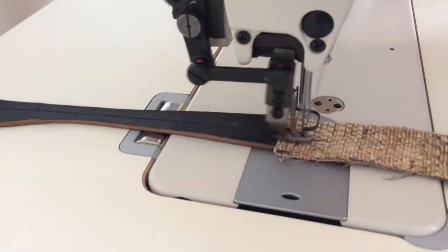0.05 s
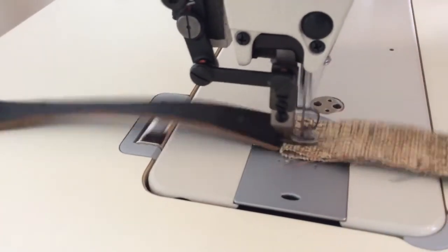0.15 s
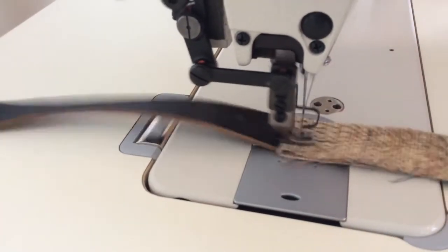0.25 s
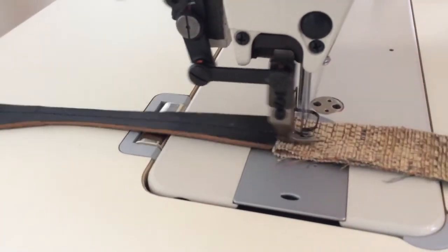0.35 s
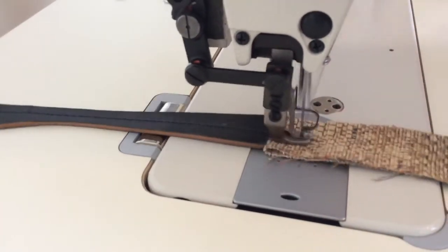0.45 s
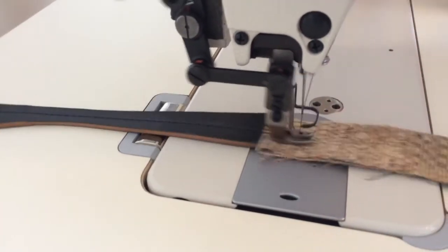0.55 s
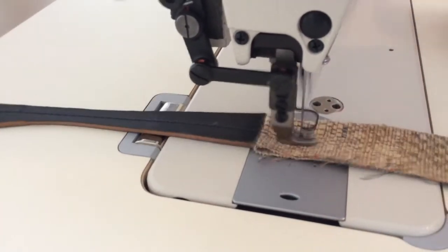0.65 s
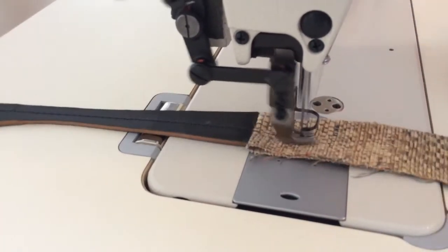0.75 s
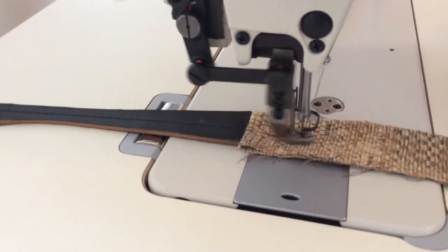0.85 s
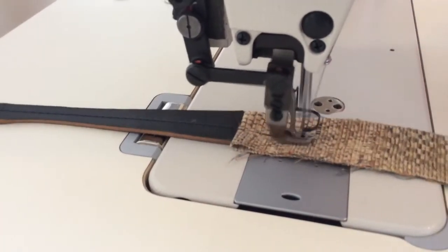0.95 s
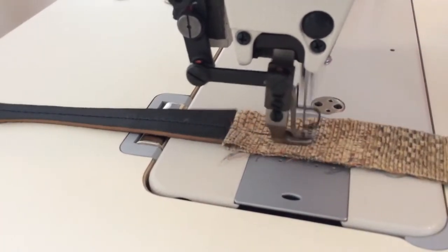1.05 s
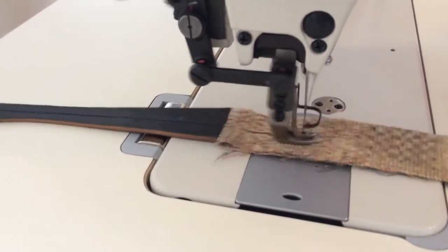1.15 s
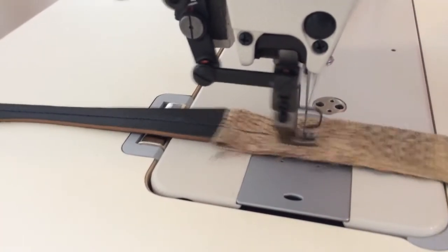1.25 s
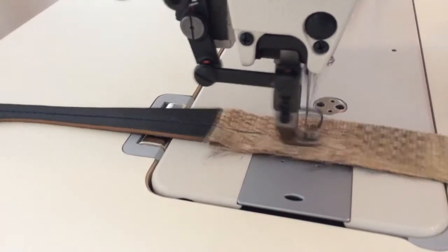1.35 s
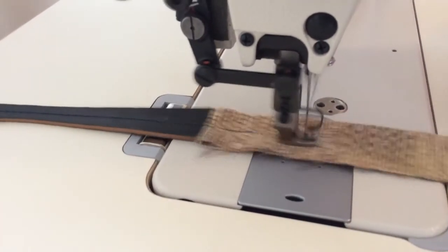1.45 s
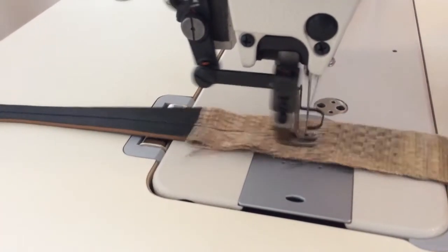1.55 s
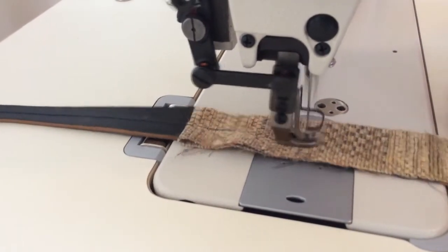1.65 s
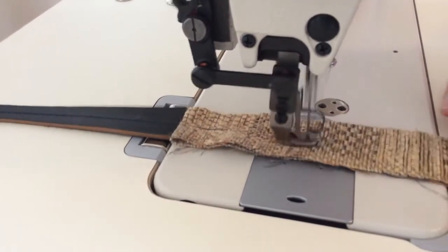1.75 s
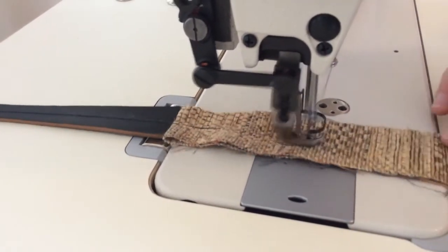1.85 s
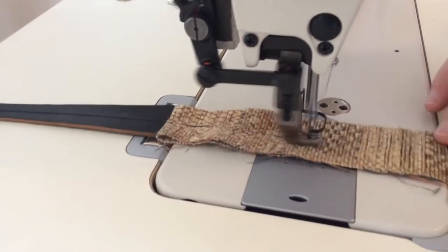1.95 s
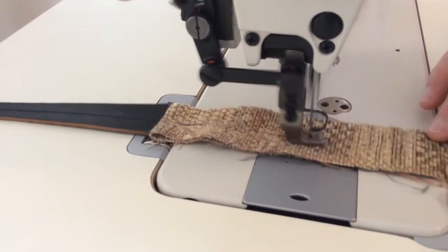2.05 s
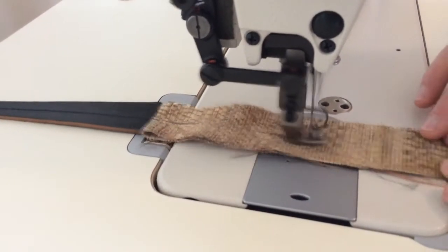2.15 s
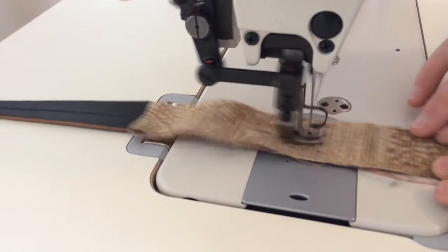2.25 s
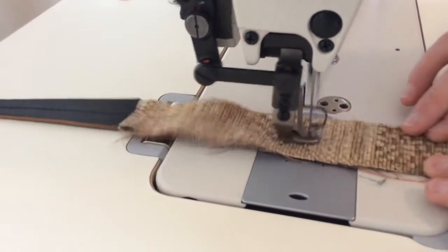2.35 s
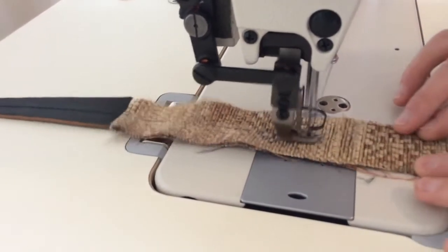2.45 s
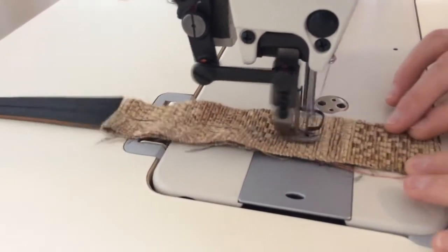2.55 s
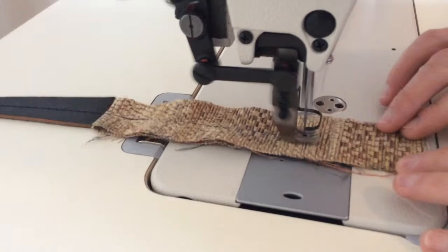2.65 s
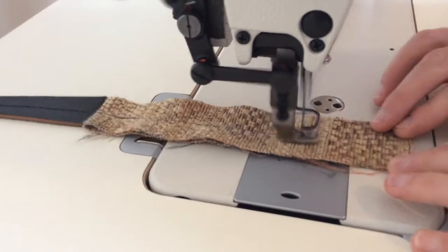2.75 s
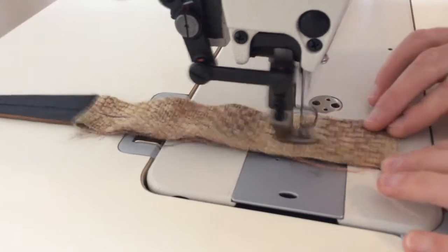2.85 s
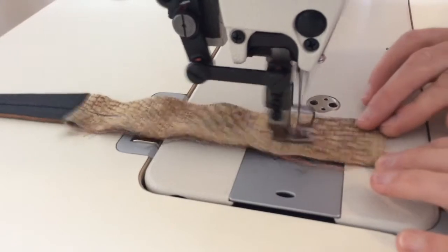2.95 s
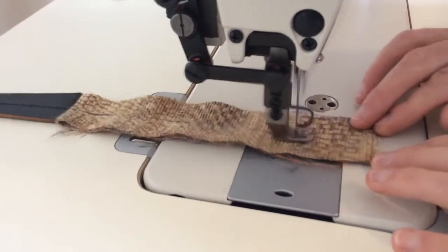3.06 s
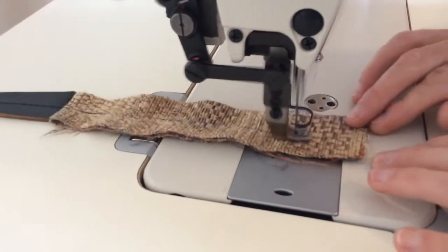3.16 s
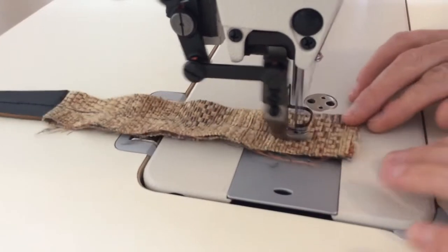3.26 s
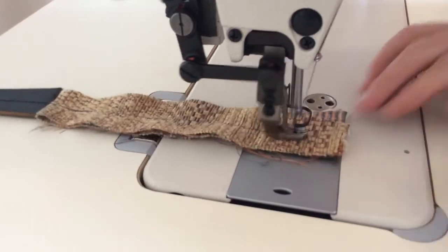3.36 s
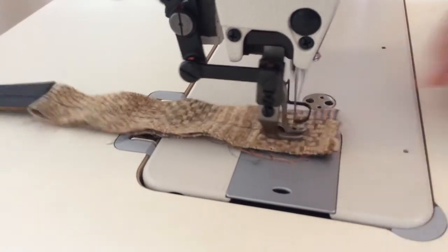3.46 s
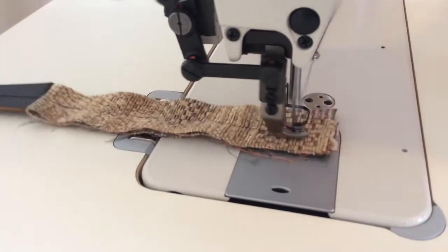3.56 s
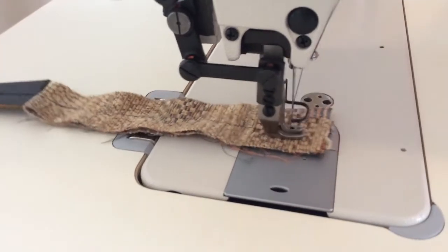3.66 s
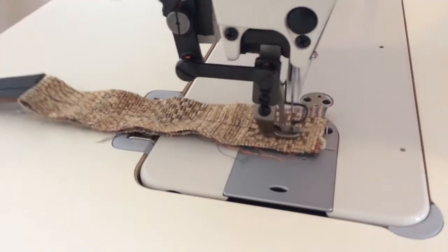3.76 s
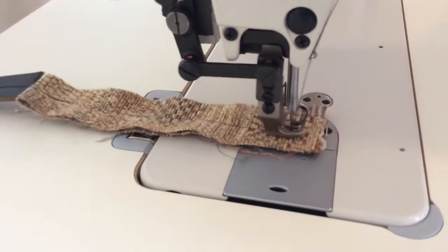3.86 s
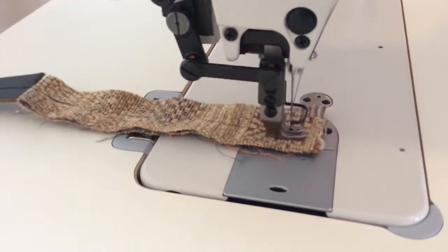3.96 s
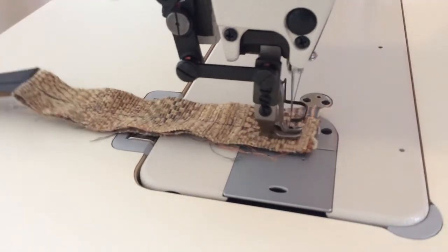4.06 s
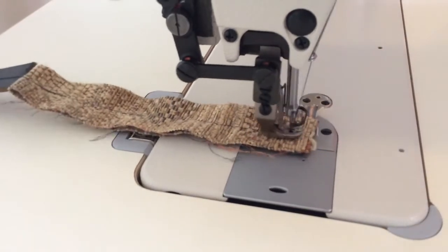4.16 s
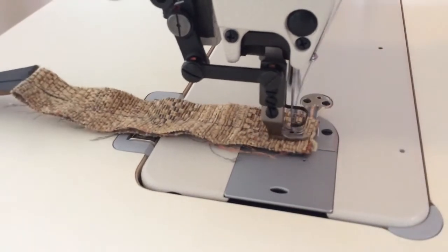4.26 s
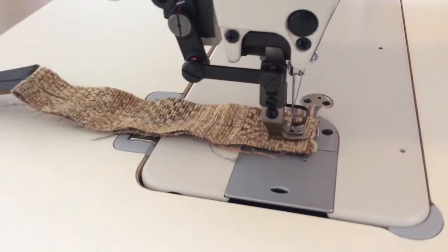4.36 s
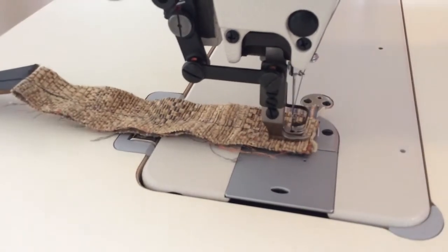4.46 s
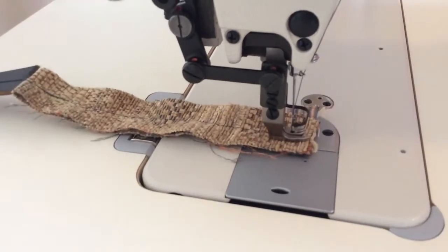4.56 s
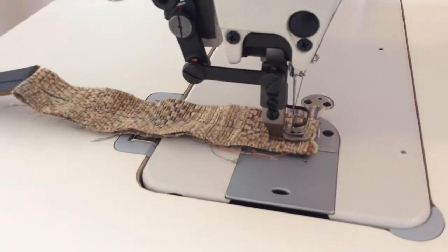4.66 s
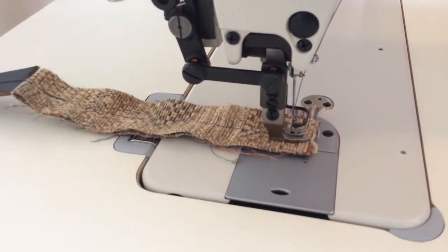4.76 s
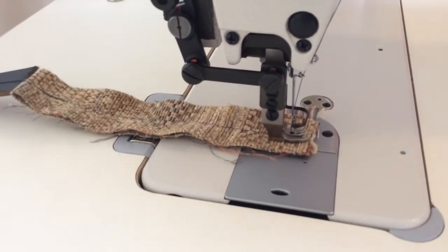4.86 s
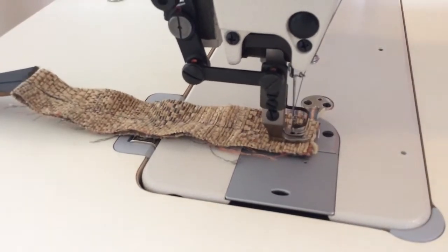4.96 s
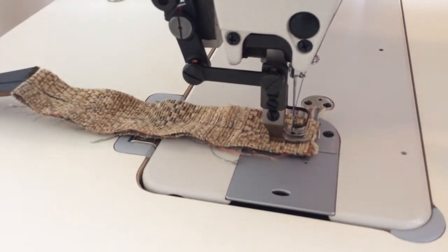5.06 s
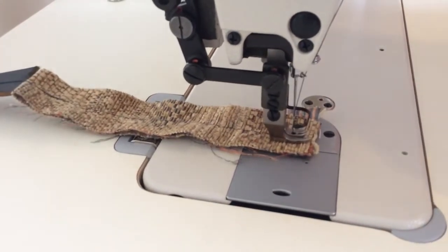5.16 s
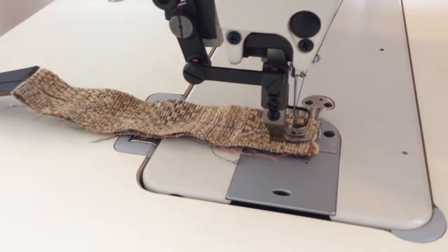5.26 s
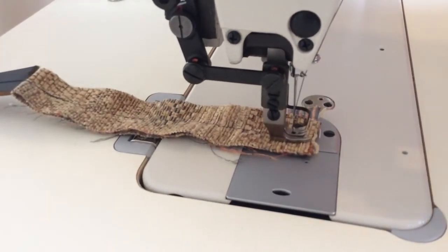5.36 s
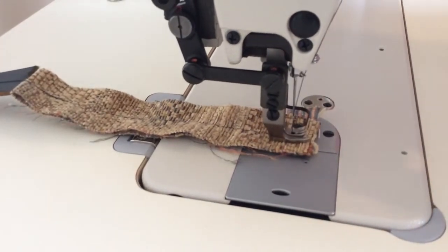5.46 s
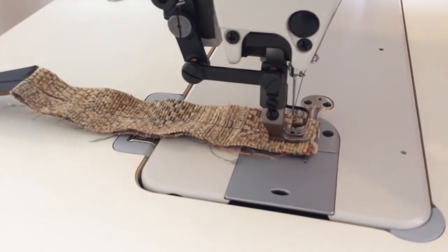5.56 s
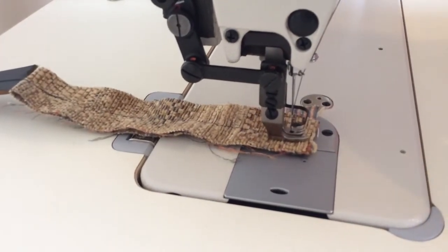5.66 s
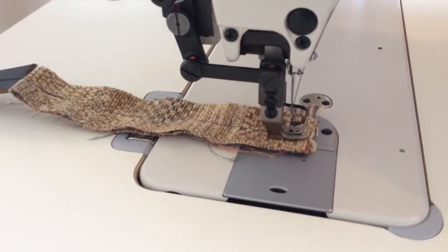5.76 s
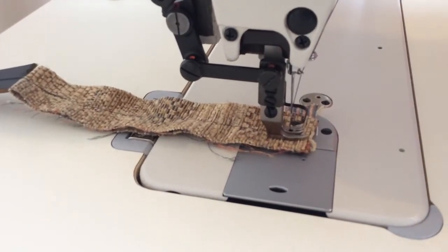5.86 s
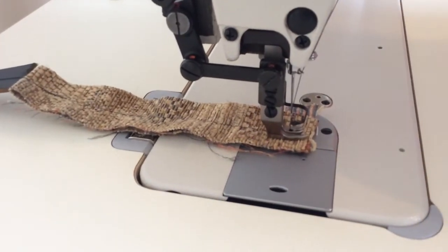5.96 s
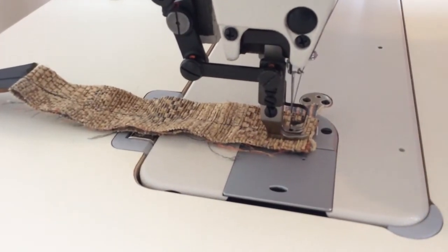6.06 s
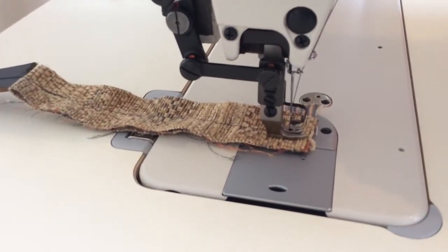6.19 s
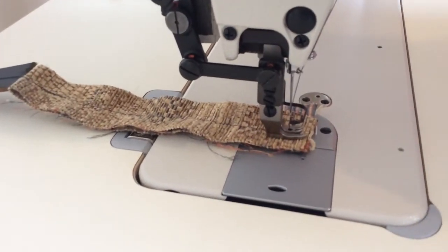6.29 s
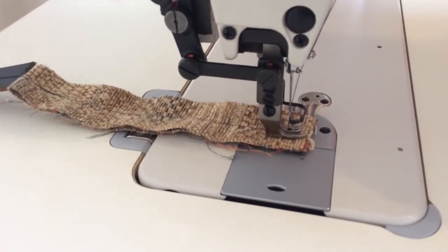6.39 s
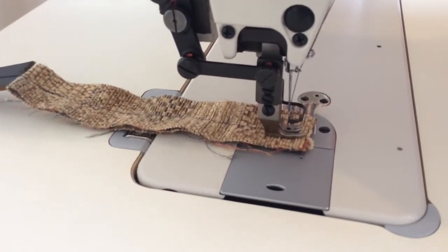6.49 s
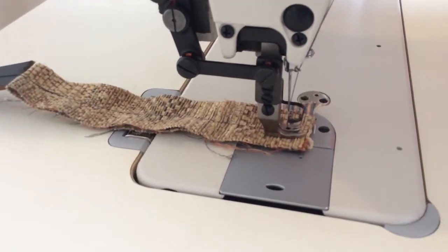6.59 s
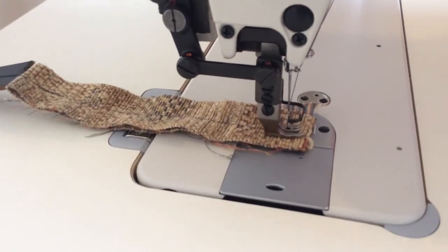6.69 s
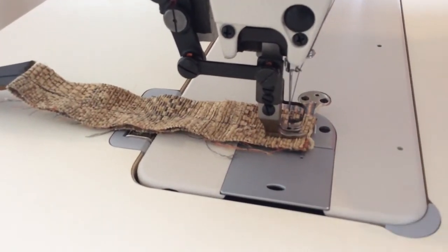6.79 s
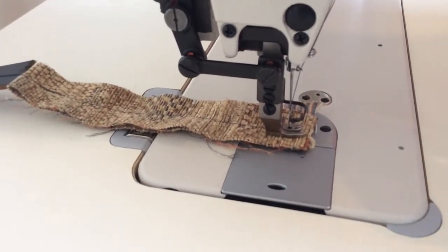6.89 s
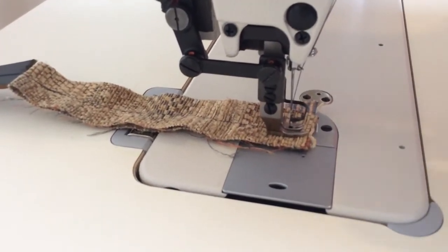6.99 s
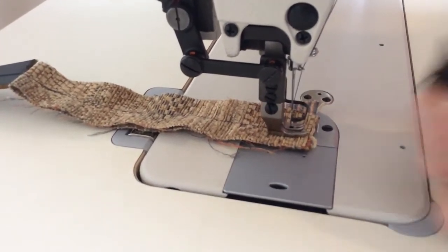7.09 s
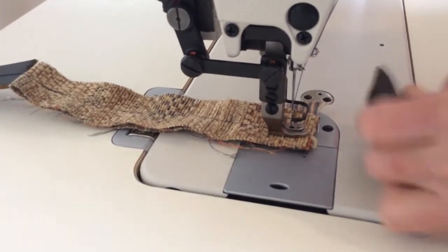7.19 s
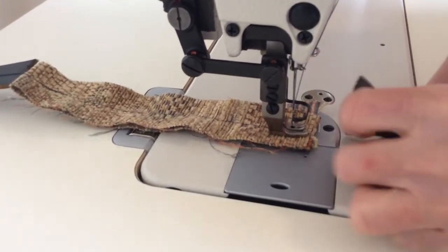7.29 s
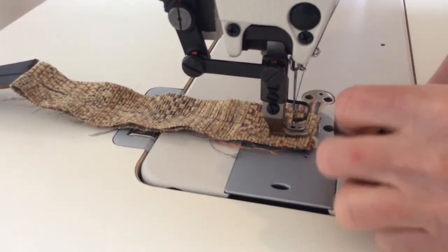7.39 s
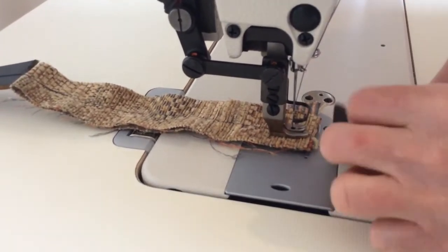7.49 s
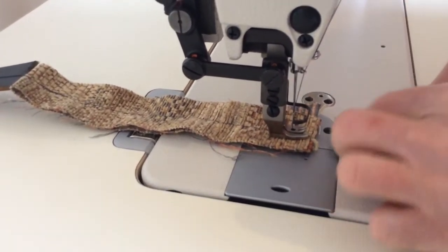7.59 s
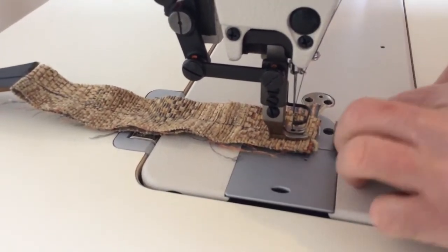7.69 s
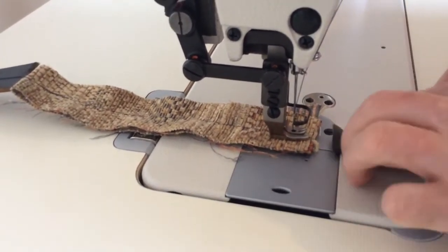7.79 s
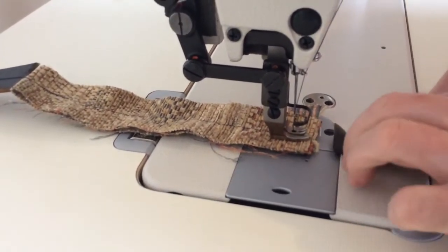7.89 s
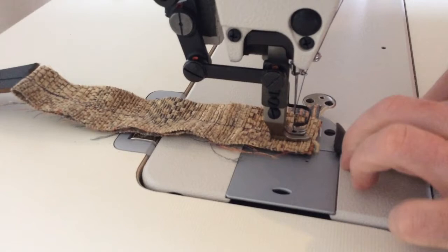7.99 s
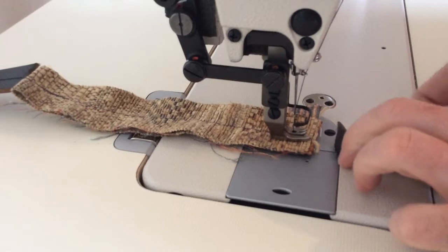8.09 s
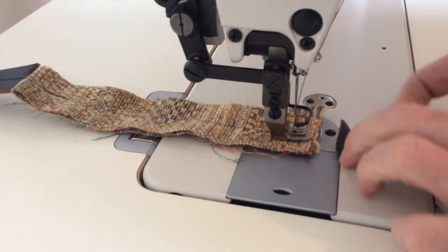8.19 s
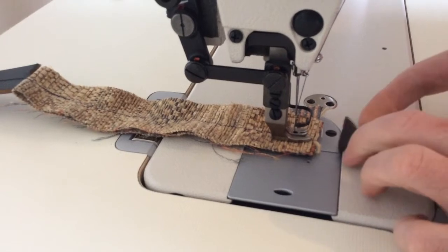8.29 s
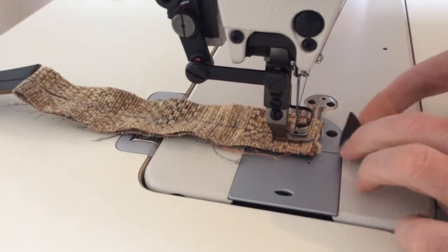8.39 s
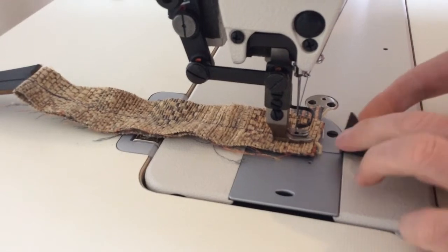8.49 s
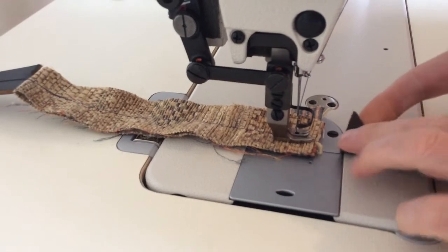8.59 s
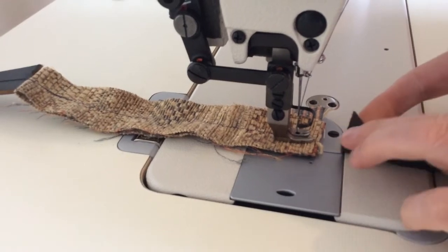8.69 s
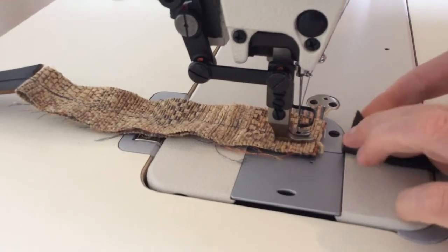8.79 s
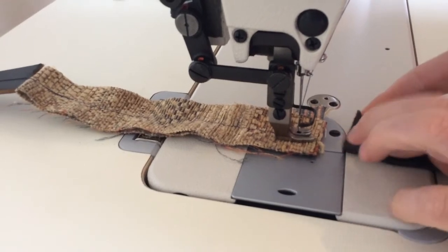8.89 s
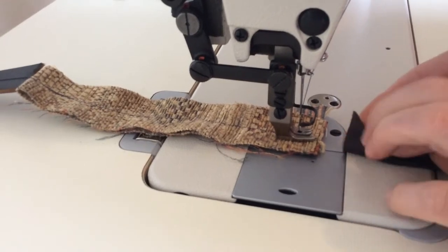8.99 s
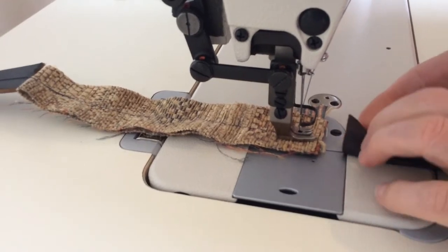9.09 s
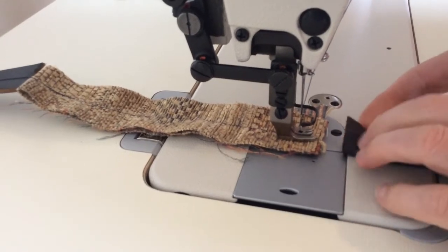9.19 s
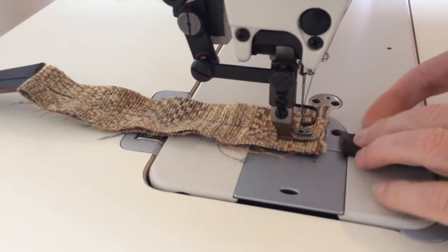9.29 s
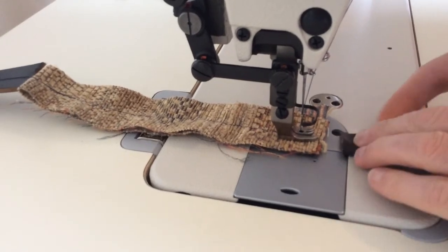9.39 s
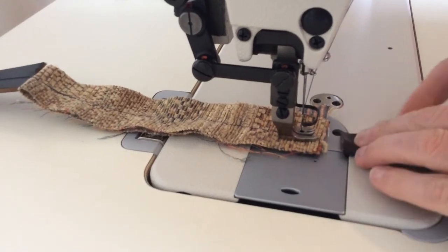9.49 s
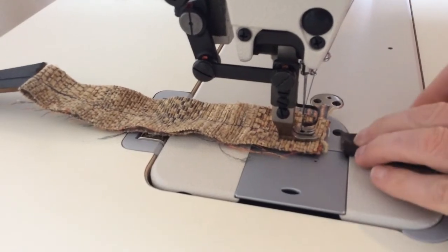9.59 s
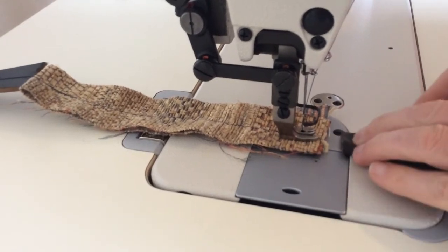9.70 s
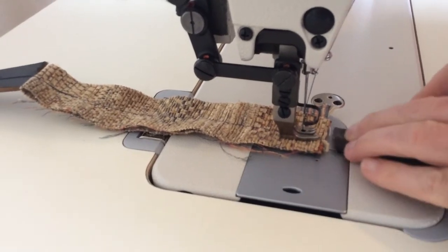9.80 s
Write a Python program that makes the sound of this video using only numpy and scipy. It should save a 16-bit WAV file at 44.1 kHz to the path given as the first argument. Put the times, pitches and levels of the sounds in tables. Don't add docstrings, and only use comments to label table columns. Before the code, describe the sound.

An industrial sewing machine speeds up into rapid metallic stitching over a humming motor, slows to a jerky ticking stop, then hands rustle cloth.

```python
import sys
import numpy as np
from scipy import signal
from scipy.fft import rfft, irfft, next_fast_len
from scipy.io import wavfile
from scipy.ndimage import uniform_filter1d

SR = 44100
rng = np.random.default_rng(int(sys.argv[2]) if len(sys.argv) > 2 else 0)


def ratio(d):
    e = np.asarray(d, float) / 20
    return 10 ** e


def log_audio(samples):
    frames = np.atleast_2d(samples).T
    limited = np.clip(frames, -1, 1)
    pcm = np.round(limited * 32767).astype(np.int16)
    wavfile.write(sys.argv[1], SR, pcm)


N = 433944
TIME = np.arange(N) / SR

# frequency in Hz, level in dB per Hz.
SHOP_AIR = [(12, -39), (20, -17), (45, -8), (151, -5.5), (183, -5.5), (310, -5), (620, -14.5), (774, -16.5),
            (1020, -16.5), (1140, -22.5), (2340, -28), (15000, -33)]
# frequency in Hz, level in dB rms.
FAN_LINES = [(48.4, -82.5), (204.6, -67.5), (317.6, -75), (409.1, -72)]

# time in seconds, hum in dB.
MOTOR_LOAD = [(0.0, -39), (.8, -38), (1.61, -36), (2.64, -35.5), (3.24, -38.5), (3.5, -39.5), (3.64, -49.5),
              (3.79, -39.5), (3.9, -51), (4.13, -38), (4.24, -53), (4.35, -48.5), (4.43, -64.5),
              (4.58, -88)]
# multiple of field speed, dB at full speed, dB lost per 10 Hz slower.
COGGING_ORDERS = [(2, -10, -0.5), (3, -10, 4), (6, -2, 1.8), (9, 3, 1.1)]
# time in seconds, level in dB.
NINTH_ORDER = [(0, -14), (.11, 2.5), (.16, -10), (.27, -2), (.4, -11.5), (.52, -7), (.63, -6), (.75, -3.5),
               (.98, -4), (1.15, -4.5), (1.33, 2), (1.45, -1), (1.6, -7.5), (2.9, -9), (3.0, 2), (3.2, 1.5),
               (3.27, -6.5), (3.36, 1)]
# frequency in Hz, width in Hz, level in dB.
TABLE_MODES = [(172.2, 11, 5), (212.7, 20.2, 3.5), (223, 12.2, 7.5), (310, 33, -0.5), (339.6, 18, -0.5)]
# frequency in Hz, width in Hz, level in dB.
ARM_MODES = [(425, 31, -4), (538.4, 17, 2.5), (572, 21, 1), (613, 29, 2), (655.4, 28, -2), (690, 53, -5.5),
             (729.5, 30, -1.5), (768, 38, -3.5), (1045, 33, -9.5)]
# frequency in Hz, level in dB per Hz.
BEARING_HISS = [(470, -7.5), (800, -5.0), (1350, -5.0), (2470, -3.0), (3370, -8.5), (4030, -1.0),
                (6050, -16.0), (8470, -18.5), (11700, -16.0), (13700, -11.5), (14250, -27)]
# frequency in Hz, width in Hz, level in dB.
SINGING_BANDS = [(1573, 12, -19), (3860, 12, -16), (4635, 270, -7.5), (8300, 100, -13.5), (12600, 120, -15),
                 (13550, 200, -14.5)]

# landing of the foot in seconds, then treble, body and
# hook treble in dB.
RUN_UP = [(-.032, -69, -78, -57.5), (0.1292, -21, -25.5, -44.5), (0.2749, -23, -28, -17),
          (0.4253, -20.5, -25.5, -19.5), (0.5683, -22, -31, -19), (0.6951, -22.5, -25, -21.5),
          (0.8124, -21, -28, -19), (0.929, -23.5, -27.5, -35), (1.0502, -25.5, -27, -22.5),
          (1.1675, -25, -25.5, -17.5), (1.2834, -22, -28, -19.5), (1.3893, -20.5, -24.5, -29.5),
          (1.4871, -23.5, -28, -15.5), (1.5773, -24, -27.5, -20.5), (1.6657, -23, -28, -18.5),
          (1.7561, -23, -26, -17.5), (1.843, -23, -27.5, -19), (1.9317, -20, -24, -13.5)]
# landing in seconds, then treble, body and hook treble in dB.
FULL_SPEED = [
    (2.0173, -23.5, -28, -18.5),
    (2.1039, -21.5, -25.5, -16),
    (2.1916, -21.5, -30, -17.5),
    (2.2774, -20.5, -29, -19),
    (2.363, -22.5, -29.5, -18),
    (2.4484, -21, -28, -14.5),
    (2.5359, -21, -28.5, -18),
    (2.6222, -22.5, -30.5, -16),
]
# landing in seconds, then treble, body and hook treble in dB.
RUN_DOWN = [(2.71, -21, -31, -16), (2.8009, -19.5, -28.5, -15.5), (2.8914, -19.5, -30, -16.5),
            (2.9881, -22, -30, -17.5), (3.0946, -24.5, -24.5, -16), (3.2033, -21.5, -26.5, -15),
            (3.3182, -21.5, -28.5, -18.5), (3.452, -22.5, -31.5, -18.5), (3.643, -23.5, -31.5, -60),
            (3.9766, -24, -32.5, -60), (4.3248, -23.5, -36, -60)]
# angle in turns after the foot, treble in dB, body in dB,
# dB gained when the turn is e times longer.
FEED_KNOCKS = [(.15, -28, -37, -1.5), (.35, -32, -37, 0), (0.487, -38.5, -47, 8)]
# time in seconds,
# treble in dB, body in dB.
CRAWL_KNOCKS = [(3.726, -21.5, -29.5), (3.742, -26, -30.5), (3.777, -31, -43), (3.894, -39, -46),
                (3.936, -44, -48), (4.272, -50, -53), (3.651, -33, -32.5), (3.983, -39, -32.5),
                (4.014, -44, -47), (4.116, -52, -50), (4.334, -34, -35.5), (4.317, -44, -43),
                (0.106, -56.5, -43), (4.073, -24, -29.5), (4.085, -46, -36), (4.1237, -29.5, -50),
                (4.297, -48, -57)]
# time in seconds, #
# treble in dB, body in dB.
FEED_CLICKS = [(.0248, -35, -46), (.2069, -34, -44), (.323, -33, -38), (.444, -27.5, -39), (.513, -33, -42),
               (.5851, -24, -34), (.6474, -30, -40), (.9472, -25, -45), (1.068, -26, -40),
               (1.1523, -29.5, -39.5), (1.2685, -30, -39.5), (1.546, -31.5, -38.5), (1.725, -32, -40.5),
               (2.4156, -29, -38), (3.4691, -22.5, -34), (3.6103, -47, -45)]
# frequency in Hz, level in dB per Hz.
CHATTER_COLOUR = [(530, -47.5), (900, -11), (2140, 6), (2470, 4.5), (2680, -4), (3400, -20.5), (3870, -12),
                  (5720, -14.5), (7510, -13), (8260, -14), (15300, -7.5)]
# frequency in Hz, t60 in seconds, dB when the foot lands,
# dB for feed and hook.
HEAD_MODES = [(1577, 0.11, -12, -18.5), (1719, 0.067, -13.5, -10.5), (1970, 0.033, -7.5, -4),
              (2327, 0.033, -9, -11), (2630, 0.1, -18, -16), (2934, 0.04, -11.5, -5),
              (3866, 0.1, -17.5, -12.5), (4200, 0.04, -11.5, -21.5), (4750, 0.057, -17, -17.5),
              (5330, 0.13, -10, -30), (7530, 0.028, -22.5, -6.5), (9070, .04, -17.5, -15.5),
              (11200, .05, -14, -14.5)]
# frequency in Hz, t60 in seconds, dB for the foot, dB for feed and hook.
FRAME_MODES = [(161, 0.16, -12.5, -17.5), (221.8, 0.08, -14.5, -20.5), (323, 0.083, -14, -25.5),
               (411.5, 0.38, -26, -28.5), (536.2, 0.21, -18.5, -15)]
BAR_DB = [-80.0, -21.5, -27, -28, -27.0, -29, -28.0, -24, -28.5, -32.0, -31.0, -31.5, -18.5, -16.5, -27.0,
          -26.0, -26.5, -25.0, -30.0, -24.0, -21.0, -28.0, -25.0, -31.0, -26.0, -19.5, -31.0, -28.0, -24.0,
          -25.0, -27.0, -25.0, -28.0, -24, -31, -32.0, -41.0]
PLATE_DB = [-80, -25, -34, -24, -33, -25, -26, -24, -24.5, -26, -24, -27, -27, -31, -24, -27.5, -36, -22,
            -36, -23, -29, -30, -29, -22, -26, -28.5, -29, -34, -30, -40, -18, -22.5, -38.5, -26, -25, -26,
            -30]
# frequency in Hz, t60 in seconds.
COVER_MODES = [(5343, .12), (1590, .12), (4280, .04)]
# time in seconds, then dB of each cover mode.
COVER_RINGS = [
    (3.646, -40, -42, -50),
    (3.982, -39, -39, -48),
    (4.329, -41, -43, -36),
]
# time in seconds, peak in dB.
BRIGHT_TICKS = [(0.158, -28.5), (0.348, -19.5), (0.4953, -20.5), (0.629, -27), (0.7677, -32), (0.9698, -24),
                (1.24, -29), (1.519, -20), (1.698, -24.5), (1.898, -28), (1.962, -19.5), (2.223, -21.5),
                (2.394, -22), (2.5038, -28), (2.567, -23), (2.653, -21), (3.0243, -25.5), (3.242, -24.5),
                (3.3755, -25), (3.5055, -26.5), (3.9737, -26), (3.986, -28)]

# time in seconds, peak in dB, frequency in Hz.
GEAR_TEETH = [(3.5982, -45, 4410), (3.681, -33, 4310), (3.7115, -29, 4270), (3.7943, -35, 4370),
              (3.8342, -43, 4840), (3.8694, -47, 4380), (3.9065, -42, 4340), (4.0135, -30.5, 4340),
              (4.1131, -32, 4350), (4.1394, -46, 4560), (4.154, -40, 4690), (4.1744, -48, 4660),
              (4.2147, -45, 4680), (4.2955, -40, 4600)]
# time in seconds, peak in dB, frequency in Hz.
HARD_TAPS = [(4.5544, -61, 8600), (4.715, -42, 7640), (4.714, -47, 1600), (4.7995, -46, 2050),
             (4.8, -55, 6500), (4.936, -52, 1380), (5.243, -56, 3020), (5.5114, -52, 3060),
             (7.2813, -51, 1484), (7.634, -56, 2430), (7.67, -49, 1540), (7.671, -50, 3900),
             (7.7096, -56, 1690), (6.536, -58, 6490), (8.273, -39, 2820), (8.274, -46, 13480),
             (8.2735, -50, 6500), (8.955, -60, 3980), (9.698, -50, 3000), (9.7314, -58, 13500),
             (9.7916, -49, 1490), (9.811, -47, 1990)]
# time in seconds, peak in dB, frequency in Hz.
SOFT_TAPS = [(6.932, -46.5, 1870), (6.9466, -48, 1900), (6.9744, -57, 1650), (6.997, -56, 1800),
             (7.013, -56, 1800), (7.054, -58, 1500), (7.075, -60, 1500), (8.177, -52, 1520),
             (8.178, -60, 5000), (4.933, -53, 330), (8.259, -55, 1400), (7.69, -60, 4000),
             (7.711, -58, 3000), (9.6866, -52, 1700), (9.697, -44, 1990), (8.02, -59, 9600)]
# start in seconds, length in seconds, level in dB,
# centre in Hz, width in Hz.
SHUDDERS = [
    (3.73, .1, -53, 65, 37),
    (3.74, .12, -54, 320, 60),
    (4.08, .1, -55, 75, 40),
    (4.07, .14, -52, 290, 70),
]
# start in seconds, length in seconds, level in dB, centre in Hz, width in Hz.
HAND_SWEEPS = [(4.939, 0.08, -69, 3800, 4000), (5.628, .04, -72, 3000, 900), (5.93, .04, -70, 6000, 1000),
               (5.759, 0.34, -79, 3000, 540), (6.4, 0.17, -69.5, 3300, 500),
               (6.03, 0.063, -70, 12000, 6600), (6.13, 0.32, -68, 3240, 450),
               (6.186, 0.049, -58, 3270, 360), (6.166, 0.15, -73, 2200, 440), (6.382, 0.2, -78, 2040, 400),
               (6.277, 0.1, -70, 5300, 7200), (6.25, .29, -72, 3080, 300), (6.13, 0.054, -71, 3200, 400),
               (6.44, .09, -75, 2100, 200), (6.739, 0.39, -71, 2040, 770), (6.999, 0.25, -67, 5200, 2400),
               (7.084, 0.22, -66, 220, 330), (7.169, 0.18, -69, 78, 46), (7.27, 0.14, -65, 4700, 1300),
               (7.595, 0.22, -70.5, 3300, 5600), (8.001, 0.27, -65, 2200, 2500),
               (8.44, 0.065, -71, 7500, 4000), (8.89, 0.074, -72.5, 4900, 8800),
               (9.039, 0.031, -69, 3800, 3800), (9.173, 0.045, -65.5, 5200, 5000),
               (9.177, 0.081, -64, 11000, 8000), (9.04, .033, -75, 11000, 6000),
               (9.25, 0.36, -71, 3540, 500), (9.27, 0.34, -69, 2400, 3400)]
# time in seconds, level in dB.
HAND_CONTACT = [(4.36, -58), (4.48, -70), (5.18, -73), (5.76, -74), (5.85, -73), (6.6, -71), (7.26, -66.5),
                (7.38, -74), (8.1, -71), (8.36, -73), (8.53, -81), (8.85, -81), (9.18, -79), (9.34, -66),
                (9.7, -81.5), (9.84, -61)]
# start in seconds, length in seconds, rustle in dB,
# slide minus rustle in dB, drag minus rustle in dB.
CLOTH_STROKES = [(4.477, 0.15, -60, -13, -21), (4.674, 0.092, -53.5, -20, -20),
                 (4.793, 0.03, -64, -21, -12), (4.853, 0.2, -58, -11, -13), (5.238, 0.18, -57.5, -11, -37),
                 (5.588, 0.079, -56, -14, -26), (5.776, 0.03, -57.5, 3, -8), (5.832, 0.036, -55, -3, -22),
                 (5.93, 0.029, -57, 5.5, -14), (6.118, 0.15, -62.5, 4, -7), (6.45, 0.11, -55.5, 0, -19),
                 (6.59, 0.054, -63, -10, -11), (6.681, 0.043, -64, 1, -16), (6.747, 0.037, -71, 6, 3),
                 (6.818, 0.091, -61.5, 3, -20), (7.02, 0.15, -58, -12, -13), (7.283, 0.12, -61, 0, -5),
                 (7.52, 0.056, -62.5, 8, -8), (7.744, 0.085, -60.5, -2, -3), (8.161, 0.14, -58.5, 8, 5),
                 (8.439, 0.049, -62, -1, -21), (9.193, 0.056, -55, -9, -18), (9.62, 0.2, -56.5, 4, 2)]

# frequency in Hz, gain in dB.
OVERALL_RESPONSE = [(18, -14), (36, 0), (15230, 0), (15330, -18), (15850, -42), (16400, -62), (16480, -95)]


def level(x, db):
    return x * ratio(db) / np.sqrt(np.mean(x ** 2))


def columns(table, off_db=-120):
    s, first, *rest = np.transpose(table)
    return [np.interp(TIME, s, first, off_db, off_db)] + [np.interp(TIME, s, c) for c in rest]


def colour(x, points):
    hz, db = np.transpose(points)
    size = next_fast_len(N + SR // 10)
    f = np.fft.rfftfreq(size, 1 / SR) + 1
    gain = ratio(np.interp(np.log(f), np.log(hz), db))
    return irfft(rfft(x, size) * gain, size)[..., :N]


def band(x, lo_hz, hi_hz):
    return signal.sosfilt(signal.butter(3, [lo_hz, hi_hz], "band", fs=SR, output="sos"), x)


def ring(x, hz, width):
    return signal.lfilter(*signal.iirpeak(hz, hz / width, SR), x)


def walk(rate):
    k = int(SR / rate)
    held = np.repeat(rng.standard_normal(N // k + 1), k)
    return 1.299 * uniform_filter1d(uniform_filter1d(held, k), k)[:N]


def noise():
    return rng.standard_normal(N)


def spikes(times, gains):
    out = np.zeros(N)
    np.add.at(out, np.clip((times * SR).astype(int), 0, N - 1), gains)
    return out


def bursts(times, db, rise, fall):
    hold_s = 0.0024
    half = int(.15 * SR)
    t = np.arange(-half, half + 1) / SR
    shape = np.where(t < 0, np.exp(np.minimum(t, 0) / rise), np.exp(-np.maximum(t - hold_s, 0) / fall))
    return signal.oaconvolve(spikes(times, ratio(db)), shape, "same")


def mode(x, hz, t60, swell):
    w = 2 * np.pi * hz / SR
    radii = np.exp(-1 / (np.array([t60 / np.log(1000), swell]) * SR))
    long, short = (signal.lfilter([0, np.sin(w)], [1, -2 * r * np.cos(w), r * r], x) for r in radii)
    return long - short


def shop():
    lines = np.zeros(N)
    for hz, db in FAN_LINES:
        phase = 2 * np.pi * np.cumsum(hz + 0.96 * walk(9.6)) / SR
        lines += ratio(db - 2.0 + 1.3 * walk(11)) * np.sin(phase)
    return level(colour(noise(), SHOP_AIR), -67.5) * ratio(1.1 * walk(4.6)) + lines


def stitches():
    s, top_db, body_db, hook_db = np.r_[RUN_UP, FULL_SPEED, RUN_DOWN].T
    return s, top_db, body_db, hook_db, np.gradient(s)


def motor_speed():
    field_turns_per_stitch, stop_s, stop_hz = 8.93, 3.9, 18
    s = stitches()[0]
    middles = (s[1:-1] + s[:-2]) / 2
    times = np.r_[middles, s[-2] + np.diff(s)[-1] / 2, stop_s]
    return np.interp(TIME, times, np.r_[field_turns_per_stitch / np.diff(s), stop_hz])


def motor_hum(hz, slower):
    s = stitches()[0]
    stitch = 2 * np.pi * np.interp(TIME, s, np.arange(len(s)))
    field = 2 * np.pi * np.cumsum(hz * (1 + 0.016 * np.sin(stitch + 1.0) + 0.008 * walk(20))) / SR
    force = level(noise(), 14.5) * ratio(0.83 * walk(40))
    for order, db, loss in COGGING_ORDERS:
        order_db = db - loss * slower + 2.2 * walk(24.98)
        if order == 9:
            order_db = order_db + columns(NINTH_ORDER, -6.0)[0]
        force = force + ratio(order_db) * np.sin(order * field)

    def shaken(part):
        return sum((-1) ** k * ratio(db) * ring(force, f, w) for k, (f, w, db) in enumerate(part))

    def steady(x):
        return x / np.sqrt(uniform_filter1d(x ** 2, int(.25 * SR)))

    arm = steady(band(shaken(ARM_MODES), 420, 1500)) * ratio(0.65 * np.cos(stitch - 2.6))
    let_go_s = 4.26
    boom_db = -2.7 - 0.6 * slower + 86 * np.clip(TIME - let_go_s, 0, .3)
    sway_db = -27 + 1.41 * slower + 99 * np.clip(TIME - let_go_s, 0, .25)
    boom = ratio(boom_db) * steady(band(shaken(TABLE_MODES), 140, 400))
    sway = ratio(sway_db) * level(band(noise(), 51, 120), 0)
    crawl_db = -5.5 - 17.0 * np.maximum(hz - 30, 0) / 10
    return arm + boom + sway + ratio(crawl_db) * level(ring(noise(), 415, 8.0), 0)


def bearings():
    hiss = colour(noise() * ratio(2.0 * walk(300)), BEARING_HISS)
    singing = sum(level(ring(noise(), f, w), db) for f, w, db in SINGING_BANDS)
    hiss = hiss + singing * np.std(band(hiss, 1700, 8500))
    return hiss / np.std(band(hiss, 1700, 8500))


def drive_whistle(hz, slower):
    carrier_hz, off_s = 15010, 4.35
    field = 2 * np.pi * np.cumsum(hz) / SR
    carrier = 2 * np.pi * carrier_hz * TIME + np.cumsum(walk(150)) * 25 / SR
    whistle = level(band(noise(), 14850, 15200), -60)
    for side, db, loss in [(-1, -39, 1.8), (0, -52, .6), (1, -49, 1.3)]:
        whistle = whistle + ratio(db - loss * slower + 3.2 * walk(23)) * np.sin(carrier + side * field)
    return whistle * (TIME < off_s)


def motor():
    hz = motor_speed()
    slower = (103 - hz) / 10
    hum_db = columns(MOTOR_LOAD)[0]
    hiss_db = hum_db - 2.4 - 0.4 * slower
    return ratio(hum_db) * motor_hum(hz, slower) + ratio(hiss_db) * bearings() + drive_whistle(hz, slower)


def follows():
    crawl_turn_s, longest_turn_s = .22, .148
    scatter_db, scatter_turn = -2.5, 0.01
    s, _, _, hook_db, turn = stitches()
    run = turn < crawl_turn_s
    s, hook_db, turn = s[run], hook_db[run], turn[run]
    slow = np.log(turn / turn.min())
    turn = np.minimum(turn, longest_turn_s)
    hook_body_db = -25 - 2.5 * slow + .3 * (hook_db - hook_db.mean())
    rows = [np.c_[s + .222 * turn, hook_db, hook_body_db], CRAWL_KNOCKS, FEED_CLICKS]
    for angle, top_db, body_db, slow_db in FEED_KNOCKS:
        slip, size, depth = rng.standard_normal((len(s), 3)).T
        db = slow_db * slow + scatter_db * size
        times = s + (angle + scatter_turn * slip) * turn
        rows.append(np.c_[times, top_db + db, body_db + db + scatter_db * depth])
    return np.concatenate(rows).T


def head_ring(s, body_db, turn, s2, body2_db):
    modes = HEAD_MODES + FRAME_MODES
    luck, luck2 = (ratio(2.5 * rng.standard_normal((len(t), len(modes)))) for t in (s, s2))
    foot_db = body_db - 4.5 * np.log(np.minimum(turn, .35) / turn.min())
    times = np.r_[s, s2] - .0015
    out = np.zeros(N)
    for k, (hz, t60, a_db, b_db) in enumerate(modes):
        gains = np.r_[ratio(foot_db + a_db) * luck[:, k], ratio(body2_db + b_db) * luck2[:, k]]
        out += mode(spikes(times, gains), hz, t60, swell=0.0014)
    bar = mode(spikes(s, ratio(np.add(BAR_DB, -4.5))), 2494, 0.12, swell=.002)
    plate = mode(spikes(s, ratio(np.add(PLATE_DB, -1.5))), 2420, .06, swell=.002)
    out += ratio(2 * walk(160)) * bar + plate
    cover_s, *cover_db = np.transpose(COVER_RINGS)
    for (hz, t60), db in zip(COVER_MODES, cover_db):
        out += mode(spikes(cover_s, ratio(db)), hz, t60, swell=.003)
    return band(out * ratio(3 * walk(70)), 120, 14000)


def knocks():
    s, top_db, body_db, _, _ = stitches()
    s2, top2_db, body2_db = follows()
    turn = np.diff(s, append=N / SR)

    def shape(db, db2, sharp, blurred, fall):
        return bursts(s, db, sharp, fall) + bursts(s2, db2, blurred, fall)

    lever_db = top_db - 14.0 - 200 * np.maximum(turn - .095, 0)
    lever = bursts(s + .65 * turn, lever_db, 0.0013, 0.005)
    scrape = bursts(s + .15 * turn, top_db - 9.5 - 60 * turn, 0.00098, 0.0051)
    extra = lever + scrape

    treble = shape(top_db - 0.6, top2_db - 6.0, 0.0006, 0.0014, 0.0011)
    treble = treble + ratio(-14.5) * shape(top_db, top2_db, 0.0013, 0.008, 0.0065) + extra
    middle = shape(body_db, body2_db, 0.002, 0.00066, 0.0036)
    middle = middle + ratio(-9.5) * shape(body_db, body2_db, 0.0015, 0.0012, 0.012) + ratio(-0.5) * extra
    chatter = level(colour(noise() * ratio(2.5 * walk(1500)), CHATTER_COLOUR), 0)
    rattle = level(band(chatter, 6200, 16500), -3) * treble
    rattle = rattle + level(band(chatter, 3030, 5480), -6.0) * middle

    blow = noise() * shape(body_db, body2_db + 1.5, 0.003, 0.0023, 0.0052)
    thud = band(blow, 740, 3000) + ratio(3.0) * band(blow, 300, 910)
    return rattle + ratio(-0.5) * head_ring(s, body_db, turn, s2, body2_db) + thud


def snaps():
    s, db = np.transpose(BRIGHT_TICKS)
    t = np.arange(SR // 50) / SR
    fall = np.exp(-t / 0.00041) + ratio(-6.5) * np.exp(-t / 0.0034)
    grit = noise()
    tick = level(ring(grit, 12600, 3400), 0) + level(band(grit, 2500, 6000), -9)
    return tick * signal.oaconvolve(spikes(s, ratio(db)), fall)[:N]


def taps():
    out = np.zeros(N)
    t = np.arange(int(.02 * SR)) / SR
    for table, edge in ((SOFT_TAPS + GEAR_TEETH, 0), (HARD_TAPS, .12)):
        for s, db, hz in table:
            grit = rng.standard_normal(len(t)) * np.exp(-t / 0.0026)
            tick = ring(grit, hz, hz / 3.3) + edge * grit
            if not edge:
                tick = ring(tick, hz, hz / 1.5)
            start = int(s * SR)
            out[start:start + len(t)] += ratio(db) * tick / np.abs(tick).max()
    return out


def swishes():
    out = np.zeros(N)
    for s, length, db, hz, width in SHUDDERS + HAND_SWEEPS:
        start, size = int(s * SR), min(int(length * SR), SR // 2)
        grit = ring(ring(rng.standard_normal(size), hz, width), hz, 2 * width)
        swell = signal.windows.tukey(size, np.clip(4.5 * length, .15, .7))
        out[start:start + size] += swell * level(grit, db)
    return out


def strokes(db):
    rise, edge_s = 0.62, 0.028
    out = np.zeros(N)
    for (s, length, *_), gain in zip(CLOTH_STROKES, ratio(db)):
        edge = [s - edge_s, s + rise * length, s + length + edge_s]
        part = slice(int(edge[0] * SR), int(edge[2] * SR))
        out[part] += gain * np.sin(np.interp(TIME[part], edge, [0, np.pi / 2, np.pi])) ** 2
    return out


def cloth():
    grains = noise() * ratio(1.8 * walk(400) + 1.0 * walk(40))
    rustle = level(band(grains, 8800, 15800), 0) + level(band(grains, 5060, 7520), -34.5)
    slide = level(band(grains, 2400, 6040), -2.5) + level(ring(grains, 3390, 560), -9.0)
    drag = level(band(grains, 1150, 2300), 0)
    contact = ratio(columns(HAND_CONTACT)[0])
    db, slide_db, drag_db = np.transpose(CLOTH_STROKES)[2:]
    out = (contact + strokes(db - 7.5)) * rustle
    out += (ratio(-4.5) * contact + strokes(db + slide_db - 12.5)) * slide
    out += (ratio(-6.5) * contact + strokes(db + drag_db - 13.5)) * drag
    return out


def room(x, t60_low, t60_high, wet_db):
    t = np.arange(int(.6 * SR)) / SR
    low, high = rng.standard_normal((2, len(t)))
    low = band(low, 80, 2500) * np.exp(-np.log(1000) * t / t60_low)
    high = band(high, 3300, 21000) * np.exp(-np.log(1000) * t / t60_high)
    tail = (low + high) * (t > .004)
    return x + ratio(wet_db) * signal.fftconvolve(x, tail / np.sqrt(np.sum(tail ** 2)))[:N]


def scene():
    sharp = room(knocks() + snaps() + taps(), 0.36, 0.37, -10.5)
    return (shop() + motor() + sharp + swishes() + cloth())[None]


def low_pass(x):
    return signal.sosfilt(signal.butter(12, 16450, fs=SR, output="sos"), x)


def record(dry):
    return low_pass(colour(dry, OVERALL_RESPONSE))


dry = scene()
out = record(dry)
log_audio(out)
```